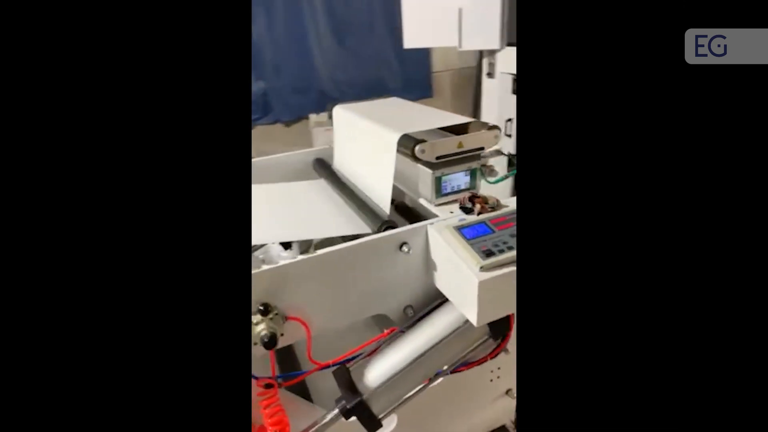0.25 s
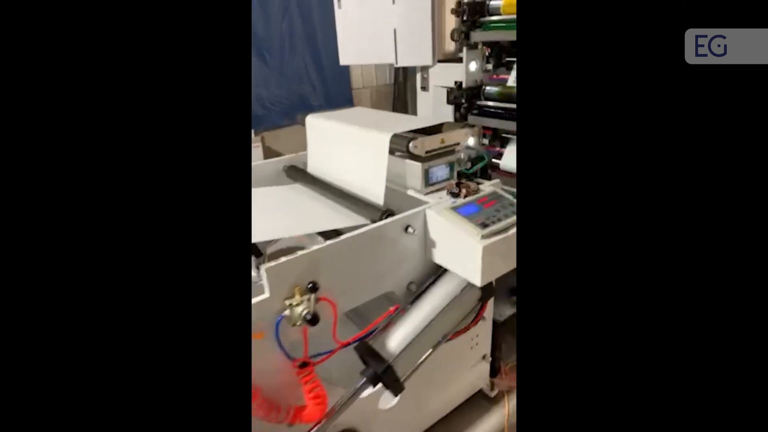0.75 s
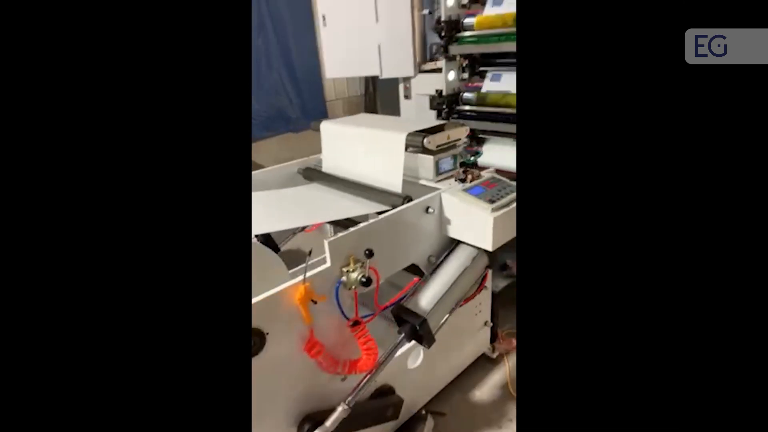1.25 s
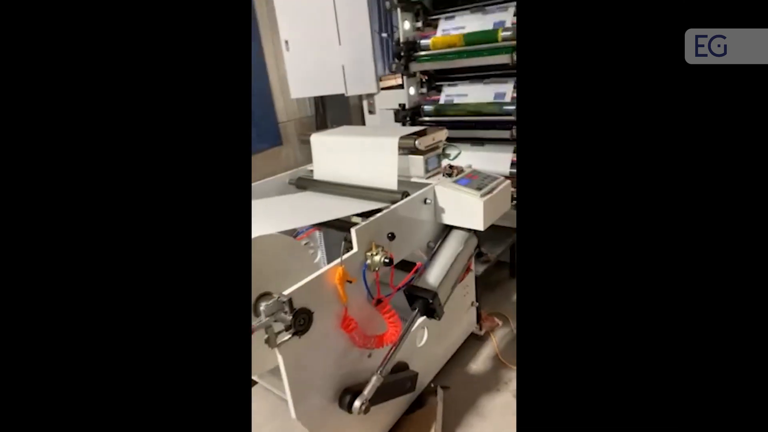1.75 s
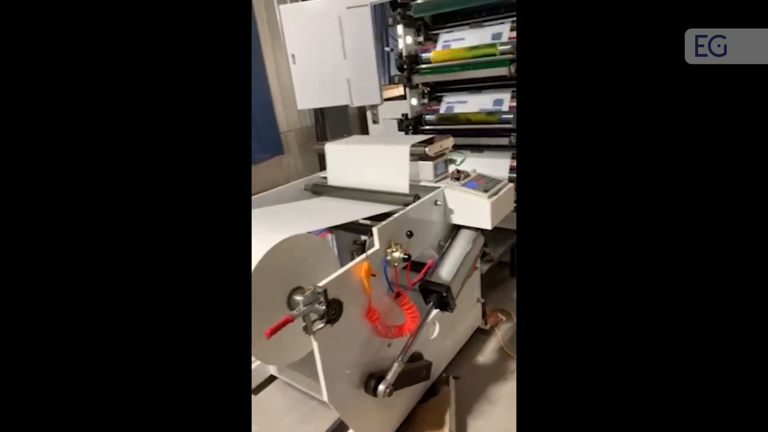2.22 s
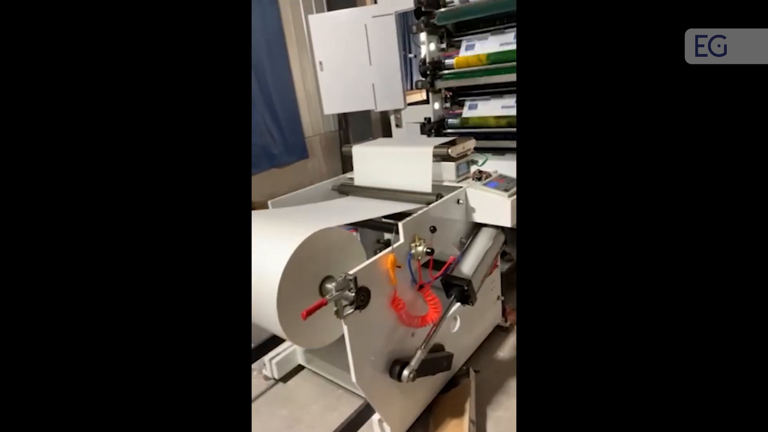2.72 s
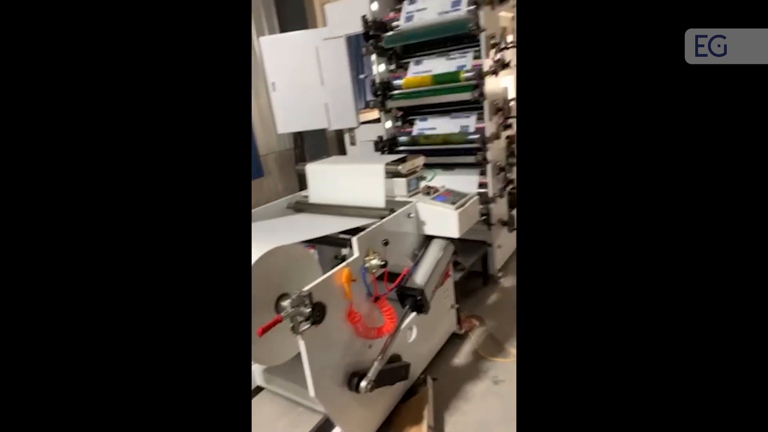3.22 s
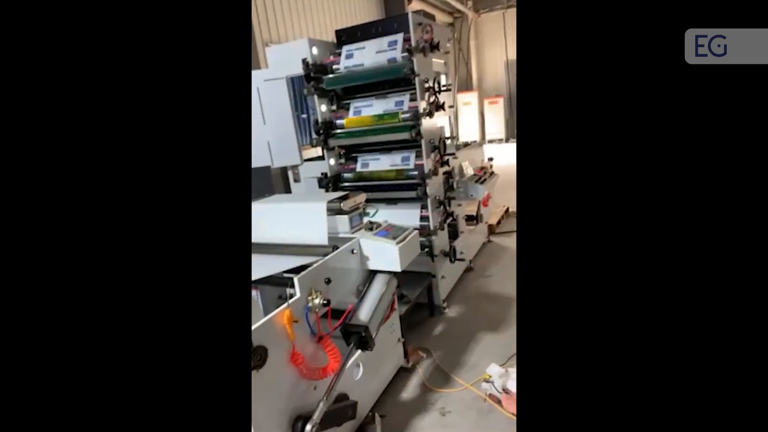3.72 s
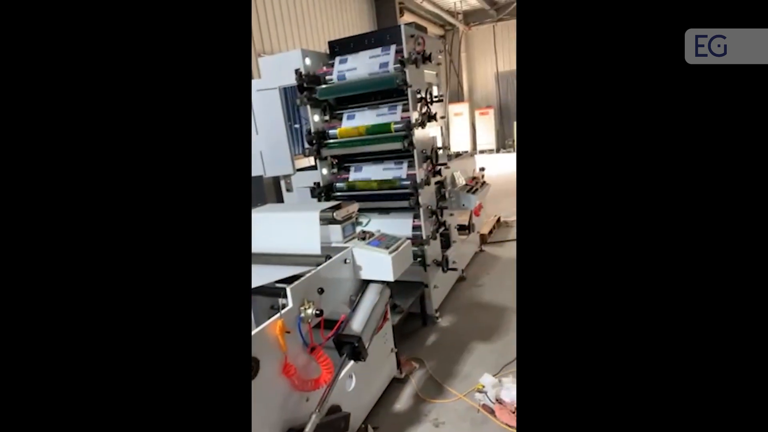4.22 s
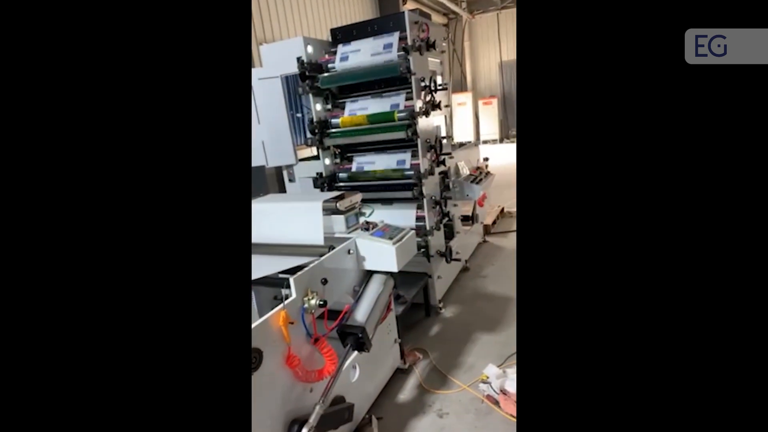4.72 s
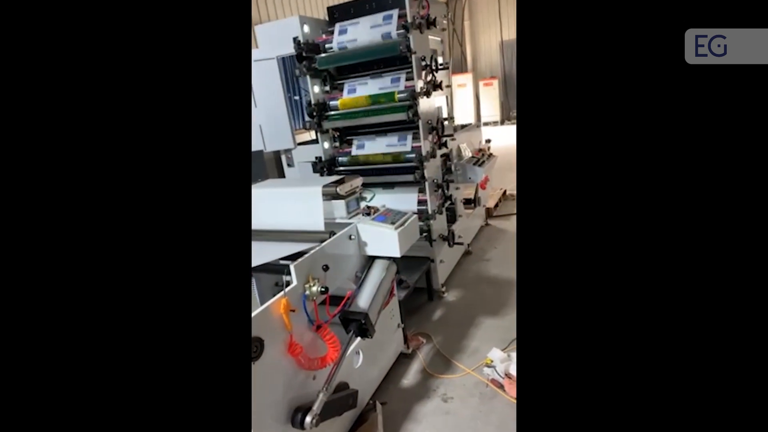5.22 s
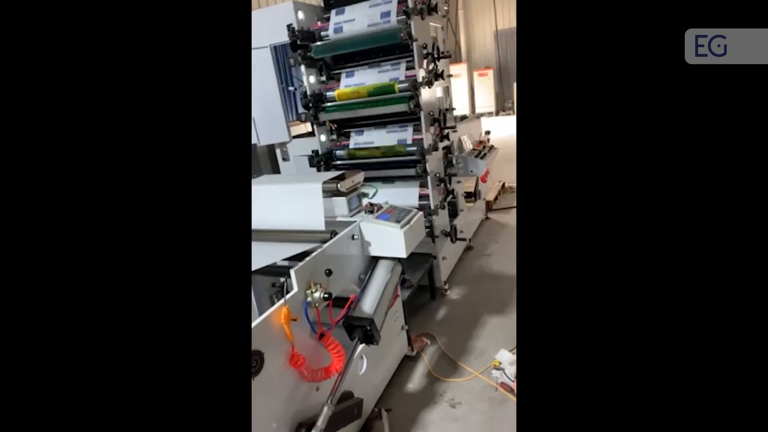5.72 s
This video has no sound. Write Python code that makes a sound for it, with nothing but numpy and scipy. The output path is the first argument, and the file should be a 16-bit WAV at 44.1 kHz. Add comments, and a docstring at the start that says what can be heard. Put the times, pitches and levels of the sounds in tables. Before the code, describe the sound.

A roll-fed printing press runs continuously in a factory hall for about six seconds, captured close by a hand-held phone with narrow stereo lows and a wider, more diffuse midrange. Dryer fans and rollers give a dense, uneven low-mid roar with rumble, clatter and soft hiss; the first 1.5 seconds are lumpier and louder, with brief hand-shake rumble dying away. Blurred gear and bearing hum sits around 370 to 800 Hz. Tiny loose parts rattle constantly. A roller ticks with a hissy snap every quarter second, clear until about 1.4, then much fainter. A very thin squeak passes at 0.3. The drive inverter's whine near 6 kHz flickers in level, often stronger after 3.6, with fainter tones near 12 kHz. Soft metallic pings sound near 2.0 and 5.5, with fainter ones between. Rumble recedes until 3 seconds as the phone backs away, returning slightly at the end.

```python
"""In a factory hall a roll-fed printing press runs steadily, close to a hand-held phone that drifts slowly away
and at the end a little nearer. Dryer fans and rollers roar as shaped noise; gears hum and the drive inverter
whines as unsteady sines. Loose parts rattle in short random rings and a roller ticks noisily once a turn. One
thin squeak and a few soft metal pings pass. Two microphone ports hear the treble a fraction of a millisecond apart."""
import sys
import numpy as np
from scipy import signal
from scipy.fft import rfft, irfft, next_fast_len
from scipy.io import wavfile
from scipy.ndimage import uniform_filter1d

SR = 44100
rng = np.random.default_rng(int(sys.argv[2]) if len(sys.argv) > 2 else 0)


def digitize_waveform(pressure):
    """Quantize a signal to 16-bit integers and store it at the path in sys.argv[1].

    Rows of a 2-D input are taken as channels; values are limited to [-1, 1].
    """
    field = np.atleast_2d(pressure).T
    bounded = np.clip(field, -1, 1)
    quanta = np.round(bounded * 32767).astype(np.int16)
    wavfile.write(sys.argv[1], SR, quanta)


def ratio(d):
    """dB to gain"""
    e = np.asarray(d, float) / 20
    return 10 ** e


N = 262395
TIME = np.arange(N) / SR
SOUND_SPEED = 343  # m/s

# the phone backs away from the press, then returns a little: t/s, added distance/m
AWAY = [(0, 0), (1.2, .48), (2.6, .8), (3.2, .85), (5, .85), (5.95, .76)]


def unit(x):
    """Scaled to rms 1."""
    return x / np.sqrt(np.mean(x ** 2) + 1e-20)


def along(points, hz):
    """(Hz, value) points read on a log axis."""
    f, v = np.transpose(points)
    return np.interp(np.log(hz + 1), np.log(f + 1), v)


def curves(rows):
    """One value per sample for each column after the time."""
    s, *cols = np.transpose(rows)
    return [np.interp(TIME, s, c) for c in cols]


def wobble(rate):
    """A random curve of straight pieces, rate knots a second."""
    return np.interp(TIME * rate, np.arange(400), rng.standard_normal(400))


def resonance(hz, centre, width):
    """A resonant hump of height 1; width in Hz at half height."""
    return 1 / (1 + (2 * (hz - centre) / width) ** 2)


def filtered(x, response):
    """x times a complex response of frequency."""
    m = next_fast_len(N + 8192)
    return irfft(rfft(x, m) * response(np.fft.rfftfreq(m, 1 / SR)), m)[..., :N]


def tone(hz, db, waver_db, drift, rate):
    """Two unrelated paths of one sine: level wavers, phase drifts (cycles), travel time follows the distance."""
    sent = TIME - curves(AWAY)[0] / SOUND_SPEED
    paths = []
    for _ in range(2):
        level = ratio(db + waver_db * wobble(rate))
        cycles = hz * sent + rng.random() + drift * wobble(rate)
        paths.append(level * np.sqrt(2) * np.sin(2 * np.pi * cycles))
    return np.array(paths)


def patchy_noise():
    """Two noise paths whose spectrum is uneven in time, with rings of rollers and guards that come and go."""
    # rollers and guards: f/Hz, width/Hz, level/dB over the roar, swing/dB, swing knots per s
    ring_table = [(260, 45, 6, 2.5, 7), (318, 25, 4, 3, 6), (650, 55, 7.5, 2.5, 5), (790, 60, 4, 3, 5),
                  (952, 25, 3.5, 3, 5), (1195, 80, 6.5, 3, 6), (1838, 40, 4, 3, 5), (2105, 120, 6.5, 3, 6),
                  (3350, 200, 2, 2, 4), (3468, 50, 5, 3, 6), (3950, 200, 1.5, 2, 6)]
    z = signal.stft(rng.standard_normal((2, N)), nperseg=512)[2]
    field = uniform_filter1d(rng.standard_normal(z.shape[1:]), size=5, axis=0)
    field = uniform_filter1d(field, size=14, axis=1)
    narrow = uniform_filter1d(rng.standard_normal(z.shape[1:]), size=30, axis=1)  # single panels come and go
    patches_db = 0.96 * unit(field) + 1.0 * unit(narrow)
    noise = signal.istft(z * ratio(patches_db), nperseg=512)[1][:, :N]

    hz, t, z = signal.stft(noise, SR, nperseg=2048)  # longer frames, to resolve the rings
    at = np.minimum(t * SR, N - 1).astype(int)
    rings_db = 0
    for centre, width, db, swing_db, rate in ring_table:
        rings_db = rings_db + (db + swing_db * wobble(rate)[at]) * resonance(hz[:, None], centre, width)
    return signal.istft(z * ratio(rings_db), SR, nperseg=2048)[1][:, :N]


def roar():
    """Broad noise of fans, rollers and web through panels and ducts, in five bands with their own levels."""
    # fans, rollers and web: f/Hz, relative level/dB per Hz (each band is levelled afterwards)
    spectrum = [(25, -37), (50, -17), (85, -1), (160, -2.5), (260, -2), (400, -4), (520, -8.5), (900, -14),
                (1400, -21), (2300, -27.5), (3100, -30), (4100, -33.5), (5200, -29), (6800, -34.5),
                (9000, -40), (11000, -39.5), (15800, -40.5)]
    # panels and ducts that colour it: f/Hz, width/Hz, level/dB over the roar
    panels = [(48, 15, 13), (87.6, 16, 6), (104, 24, 4), (162.8, 41, 5.5), (355, 39, 2), (2600, 270, 3),
              (5350, 3100, 3), (11950, 360, 4.5)]
    # rumble before its heave: level/dB rms at the nearest point, loss/dB per metre of backing away
    rumble_level = (-36.5, 3.24)
    # middle of the roar, before its wobbles: t/s, body level/dB rms, clatter level/dB rms
    middle_levels = [(0, -27, -28.5), (.3, -25.5, -30.5), (.46, -27.5, -30.5), (.56, -24, -27.5),
                     (.72, -30.5, -30), (.88, -26.5, -30.5), (1.0, -23, -30), (1.22, -27.5, -31.5),
                     (1.4, -28, -29.5), (1.6, -27.5, -30.5), (1.9, -28, -31), (2.27, -27.5, -34),
                     (2.34, -26.5, -29.5), (2.45, -29.5, -32), (2.62, -26, -29.5), (3.2, -28.5, -31.5),
                     (3.9, -28.5, -30), (4.15, -28, -31.5), (5.1, -28.5, -31.5), (5.95, -28, -30.5)]
    # fine grit before its wobble: t/s, level/dB rms
    grit_level = [(0, -36), (.7, -37.5), (1.5, -37.5), (2.4, -38.5), (3.2, -38), (4.2, -38.5), (5, -37),
                  (5.95, -38)]
    # treble hiss before its flutter: t/s, level/dB rms
    hiss_level = [(0, -43), (.12, -45), (.3, -42), (.45, -44.5), (.9, -46), (1.4, -45), (2.8, -46.5),
                  (4.4, -46.5), (5.3, -46.5), (5.65, -45), (5.95, -44)]
    noise = patchy_noise()

    def colour(hz):
        humps_db = sum(db * resonance(hz, centre, width) for centre, width, db in panels)
        return ratio(along(spectrum, hz) + humps_db)

    def below(hz, edge_hz):
        return 1 / (1 + (hz / edge_hz) ** 6)

    def band(lo, hi):
        return unit(filtered(noise, lambda hz: colour(hz) * (below(hz, hi) - below(hz, lo))))

    near_db, loss_db = rumble_level
    body_db, clatter_db = curves(middle_levels)
    rumble_db = near_db - loss_db * curves(AWAY)[0] + 1.0 * wobble(2.26)  # heaves slowly
    body_db = body_db + 0.15 * wobble(21.98)  # wavers slightly at random
    clatter_db = clatter_db + .5 * wobble(9)  # the rollers rattle unevenly
    grit_db = curves(grit_level)[0] + 0.4 * wobble(7.2)
    hiss_db = curves(hiss_level)[0] + 0.64 * wobble(3.2) + .5 * wobble(25.1)  # the moving web is uneven
    return (ratio(rumble_db) * band(5, 135) + ratio(body_db) * band(135, 480)
            + ratio(clatter_db) * band(480, 1350) + ratio(grit_db) * band(1350, 6500)
            + ratio(hiss_db) * band(6500, 18000))


def handling():
    """Low shake of the hand: noise humped near its edge frequency, fading steadily from the start."""
    # shake: level/dB rms at the start, loss/dB per s, edge f/Hz
    shake = (-33, 12, 82)
    start_db, loss_db, edge_hz = shake
    low = filtered(rng.standard_normal((2, N)), lambda hz: (hz / edge_hz) ** 3 / (1 + (hz / edge_hz) ** 9))
    return ratio(start_db - loss_db * TIME) * unit(low)


def gears():
    """Mesh harmonics and bearing tones, blurred by play in the drive."""
    mesh_hz = 158.8
    # gear mesh: multiple of the mesh frequency, level/dB rms before waver
    mesh_table = [(2, -75), (3, -51.5), (4, -44.5), (5, -47), (6, -65)]
    # other faint steady-pitched tones: f/Hz, level/dB rms before waver
    bearing_table = [(371, -46), (496, -47)]
    mesh = sum(tone(k * mesh_hz, db, waver_db=5.5, drift=0.26, rate=17) for k, db in mesh_table)
    bearings = sum(tone(hz, db, waver_db=4.5, drift=0.14, rate=12) for hz, db in bearing_table)
    return mesh + bearings


def rattle():
    """Short random rings of small loose parts, each with a sudden start and a decay of so many cycles."""
    # rattle: rings per s, centre f/Hz, pitch spread/octaves, decay/cycles, size spread/dB, level/dB rms
    loose_parts = (300, 2300, .6, 12, 4, -42)
    rate, centre_hz, octaves, cycles, spread_db, db = loose_parts
    count = 2400
    when = rng.random((2, count)) * count / rate
    pitch = np.clip(rng.standard_normal((2, count)), -2, 1.5)
    size = np.minimum(rng.exponential(size=(2, count)), 3)
    t, paths = TIME[:500], []
    for w, p, s in zip(when, pitch, size):
        hz = (centre_hz * 2 ** (octaves * p))[:, None]
        strength = ratio(spread_db * s)[:, None] * centre_hz / hz  # lower rings are stronger
        ring = strength * np.exp(-3 * t * hz / cycles) * np.sin(2 * np.pi * hz * t)
        at = np.minimum(w * SR, N).astype(int)[:, None] + np.arange(len(t))
        paths.append(np.bincount(at.ravel(), ring.ravel(), N + len(t))[:N])
    return ratio(db) * unit(np.array(paths))


def inverter():
    """Switching sidebands: the carrier and its double, offset by multiples of the motor frequency."""
    carrier_hz, motor_hz, spell_fade_s = 6000, 35, 0.053
    # strongest strand, three motor multiples below the carrier: t/s, level/dB rms before waver
    low_strand = [(0, -62), (.27, -56), (.37, -58), (.47, -47), (.55, -45), (.62, -58), (.72, -45),
                  (.9, -46), (1, -60), (1.13, -52), (1.45, -48), (1.7, -62), (1.9, -58), (2.05, -52),
                  (2.3, -51), (2.5, -54.5), (2.8, -46), (2.97, -66), (3.12, -52), (3.65, -42.5), (4.1, -54),
                  (4.35, -44), (4.6, -43.5), (5.05, -43), (5.2, -56), (5.6, -58), (5.95, -48)]
    # strand three motor multiples above the carrier: t/s, level/dB rms before waver
    high_strand = [(0, -52), (.22, -43), (.31, -58), (.38, -50), (.46, -60), (.55, -42), (.64, -62),
                   (.73, -47), (.82, -63), (.89, -45), (.96, -55), (1.05, -55), (1.25, -59), (1.4, -61),
                   (1.52, -55), (1.8, -54), (2.05, -46.5), (2.3, -63), (2.55, -59), (2.67, -47),
                   (2.85, -49.5), (3.0, -43.5), (3.3, -48), (3.45, -62), (3.55, -50), (3.75, -57),
                   (4.4, -58), (4.6, -53), (4.9, -57), (5.3, -51), (5.47, -45), (5.65, -61), (5.95, -50)]
    # three fainter strands: motor multiple, usual level/dB rms before waver
    faint = [(-5, -63), (-1, -67), (1, -61.5)]
    # spells added to a faint strand: start t/s, length/s, motor multiple, added level/dB rms before waver
    spell_table = [(0, 0.33, 1, -50), (.15, 0.37, -5, -51), (.47, 0.11, 1, -56), (.57, 0.15, -5, -49),
                   (.7, 0.25, -1, -49.5), (.84, .09, 1, -58), (0.998, 0.077, -1, -47), (1.173, .2, -5, -52),
                   (2.105, .26, 1, -55), (2.66, 0.066, 1, -48), (2.66, 0.13, -1, -50),
                   (3.05, 0.13, -5, -56), (3.25, 0.18, -1, -53), (3.3, 0.12, 1, -59), (3.45, 0.13, -5, -52),
                   (3.7, 0.58, 1, -61), (4.55, 0.25, -5, -54), (5.13, .08, 1, -51), (5.53, 0.069, 1, -47),
                   (5.8, 0.09, -5, -48)]
    # weaker sidebands: carrier multiple, motor multiple, level/dB rms before waver
    sidebands = [(1, 7, -69), (1, 9, -67), (2, -14, -70), (2, -8, -71), (2, -6, -71), (2, -4, -64),
                 (2, -2, -64), (2, 0, -67), (2, 2, -66), (2, 4, -65), (2, 8, -69), (2, 10, -72),
                 (2, 14, -73)]

    def strand(k, db):
        return tone(carrier_hz + k * motor_hz, db, waver_db=2.2, drift=0.09, rate=24)

    whine = strand(-3, curves(low_strand)[0]) + strand(3, curves(high_strand)[0])
    for k, usual_db in faint:
        strength = ratio(usual_db)
        for s, length, multiple, db in spell_table:
            if multiple == k:
                inside_s = np.minimum(TIME - s, s + length - TIME)
                strength = strength + ratio(db) * np.clip(inside_s / spell_fade_s + .5, 0, 1)
        whine = whine + strength * strand(k, 0)
    for c, k, db in sidebands:
        whine = whine + tone(c * carrier_hz + k * motor_hz, db, waver_db=2.5, drift=0.1, rate=11)
    return whine


def ticks():
    """Each turn a sticky spot peels off the roller: a hiss swells, snaps and dies away."""
    first_s, turn_s, scatter_db = .1284, .25222, .8
    # strength of the tick before scatter and colour: t/s, level/dB
    strength = [(.13, -30), (.38, -31.5), (.63, -32.5), (.886, -30), (1.14, -31.5), (1.39, -35.5), (2, -40),
                (3, -42), (4.4, -41), (5.7, -39)]
    # colour of a tick: f/Hz, level/dB
    tick_colour = [(3000, -24), (7000, -5), (9000, 0), (11500, 2), (13000, 4), (15500, 2)]
    out = np.zeros((2, N + SR))
    t = TIME[:SR // 5] - .06  # the swell begins before the snap at 0
    after = np.clip(t, 0, None)
    snap = ratio(-60 * after / .038) * (1 - np.exp(-after / .0007))
    swell = 0.15 * np.exp(-((t - .01) / .035) ** 2)
    sent = np.arange(first_s, N / SR, turn_s)
    heard = sent + np.interp(sent, *np.transpose(AWAY)) / SOUND_SPEED
    for s in heard:
        db = np.interp(s, *np.transpose(strength)) + scatter_db * rng.standard_normal()
        grain = np.sign(rng.standard_normal((2, len(t))))  # even grains keep every snap at its strength
        start = round((s + t[0]) * SR)
        out[:, start:][:, :len(t)] += ratio(db) * (snap + swell) * grain
    return filtered(out[:, :N], lambda hz: ratio(along(tick_colour, hz)))


def squeak():
    """A brief thin whistle: one gated, slightly unsteady sine."""
    # squeak: start t/s, length/s, f/Hz, level/dB rms before waver
    whistle = (.287, .05, 10220, -51)
    s, length, hz, db = whistle
    gate = np.clip(np.minimum(TIME - s, s + length - TIME) / .004, 0, 1)
    return gate * tone(hz, db, waver_db=1.5, drift=.1, rate=41.4)


def pings():
    """A soft blow rings one mode of a metal part for a moment, alike on both paths."""
    ping_hz = 1848
    # soft blows: t/s, level/dB before the rise and decay
    blows = [(1.989, -18), (3.3116, -29), (3.5409, -26), (4.854, -34), (5.2859, -27), (5.5184, -14.5)]
    out, t = np.zeros(N + SR), TIME[:SR // 4]
    envelope = ratio(-60 * t / 0.094) * (1 - np.exp(-t / 0.029))
    ring = envelope * np.sin(2 * np.pi * ping_hz * t)
    for s, db in blows:
        out[round(s * SR):][:len(t)] += ratio(db) * ring
    return out[:N]


def microphone_ports(shared, other):
    """Two spaced ports: likeness, level and phase between left and right depend on frequency."""
    # likeness of the two ports: f/Hz, likeness 0-1
    alike = [(45, .96), (100, .99), (200, .985), (380, .92), (480, .8), (570, .38), (690, .25), (900, .55),
             (1120, .33), (1800, .6), (3200, .47), (4300, .93), (4700, .98), (6000, .97), (9000, .95),
             (15000, .92)]
    # balance of the ports: f/Hz, left over right level/dB
    balance = [(60, -3), (130, 0), (290, 2.5), (640, -0.5), (1410, -1.7), (3100, 0), (6820, 0),
               (15000, 0.2)]
    # phase by which the left leads: f/Hz, lead/rad
    lead = [(130, 0), (220, -.11), (430, -.62), (570, -1.65), (690, -1.2), (775, -.25), (1030, -.9),
            (1400, -.05), (2150, 1), (3000, 2.6), (3500, 1.9), (3900, 2), (4350, 2.7), (4750, 3.14),
            (5170, 3.8), (5900, 5.05)]
    # the same at the top of the treble: f/Hz, lead/rad
    lead_end = [(6850, 2 * np.pi), (13080, 5 * np.pi), (19300, 8 * np.pi)]
    half = np.array([[.5], [-.5]])  # left and right each take half the difference

    def turn(hz):
        return np.arccos(np.clip(along(alike, hz), 0, 1)) / 2

    def port(hz):
        phase = np.interp(hz, *np.transpose(lead + lead_end))
        return ratio(half * along(balance, hz)) * np.exp(1j * half * phase)

    mid = filtered(shared, lambda hz: np.cos(turn(hz)))
    side = filtered(other, lambda hz: np.sin(turn(hz)))
    return filtered(np.array([mid + side, mid - side]), port)


def scene():
    """The press and the hand, as a shared and an unrelated part of the sound field, reach the two ports."""
    shared, other = roar() + handling() + gears() + rattle() + inverter() + ticks() + squeak() + pings()
    return microphone_ports(shared, other)


def roll_off(x):
    """The treble ends steeply here."""
    return signal.sosfilt(signal.butter(12, 15880, fs=SR, output="sos"), x)


def record(dry):
    """The phone's band limit: nothing from 15830 Hz upward passes."""
    mix = filtered(dry, lambda hz: hz < 15830)
    return roll_off(mix)


dry = scene()
out = record(dry)
digitize_waveform(out)
```